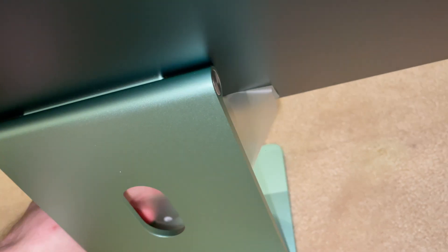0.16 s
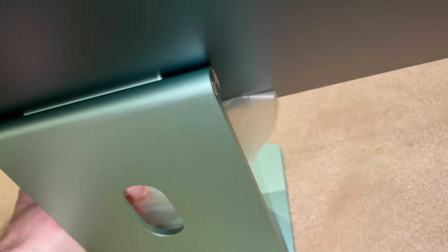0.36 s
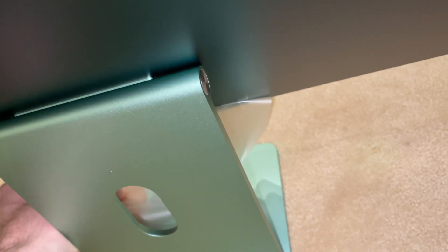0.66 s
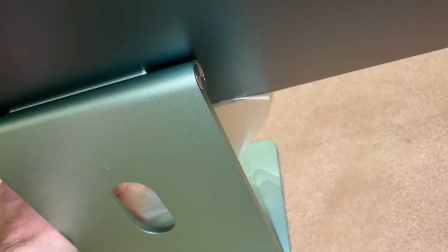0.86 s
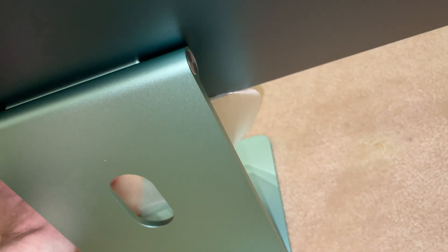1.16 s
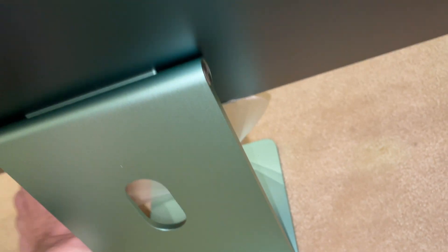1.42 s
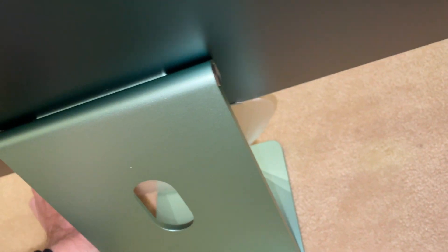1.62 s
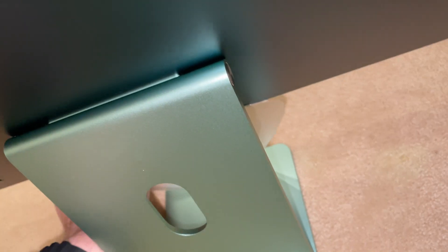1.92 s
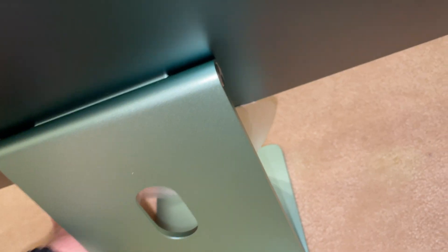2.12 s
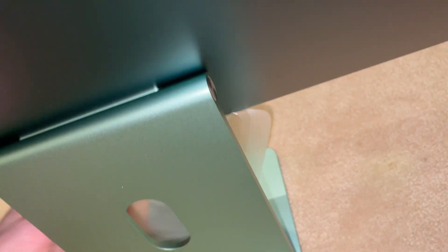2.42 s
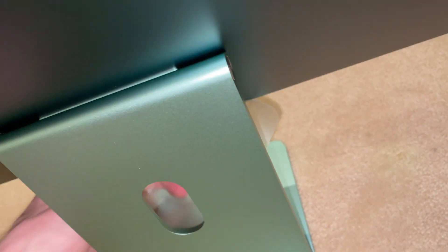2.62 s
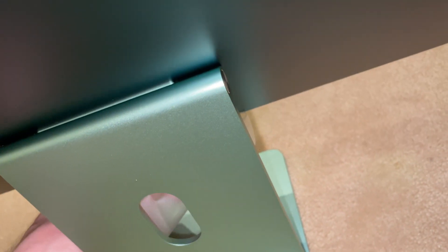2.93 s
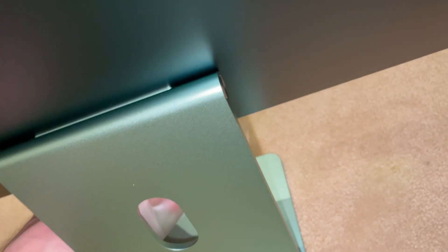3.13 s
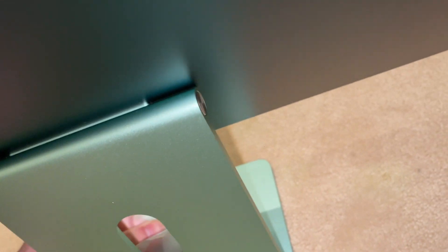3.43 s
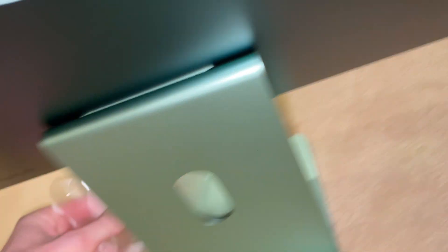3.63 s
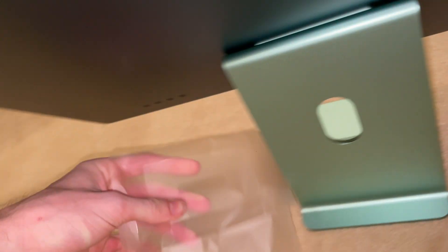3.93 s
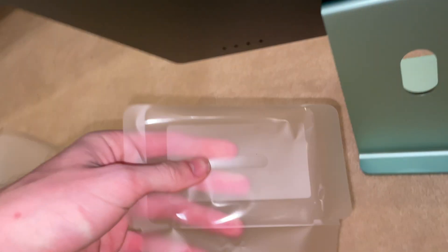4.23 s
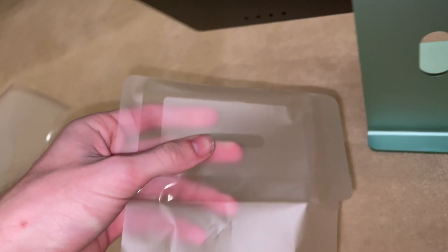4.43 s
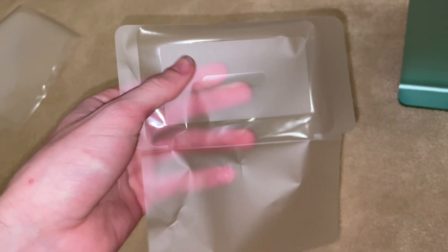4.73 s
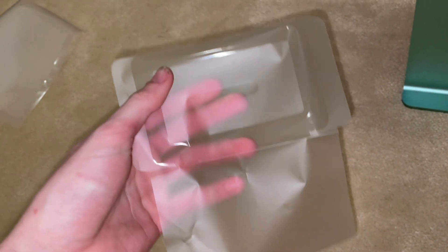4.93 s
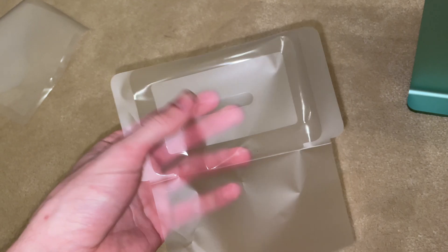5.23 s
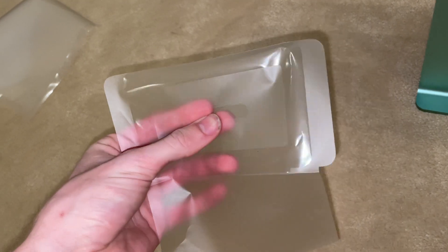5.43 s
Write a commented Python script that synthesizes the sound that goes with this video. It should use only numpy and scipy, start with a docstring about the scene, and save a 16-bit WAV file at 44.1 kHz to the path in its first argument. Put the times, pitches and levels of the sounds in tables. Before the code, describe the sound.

Close-up crinkling of a clear plastic sheet: sparse pops and soft rubbing, a dense burst of sharp cracks, a low bump, then near silence.

```python
"""A stiff plastic film is pulled off the metal stand of a monitor and turned over in one hand, close by in a quiet room.
Its creases snap through and send dispersive bending waves across the sheet, treble first and bass last.
Sliding is grainy noise, a hiss over a duller rub; the loose sheet flutters and a taut edge sings in a narrow band.
Smaller creases tick and rustle as impulses that start shorter bending waves; resonances of the sheet colour it all.
The stand is a set of damped modes: it hums when tugged, and rocks as the film comes free."""
import sys
import numpy as np
from scipy import signal
from scipy.fft import rfft, irfft, next_fast_len
from scipy.io import wavfile

SR = 44100
rng = np.random.default_rng(int(sys.argv[2]) if len(sys.argv) > 2 else 0)


def persist_wave(psi):
    """Save psi, clipped to +-1, as 16-bit WAV."""
    counts = np.round(np.clip(psi, -1, 1) * 32767).astype(np.int16)
    wavfile.write(sys.argv[1], SR, np.atleast_2d(counts).T)


N = 245195
TIME = np.arange(N) / SR
WAVE_SIZE = 6144   # samples in one bending wave

# large creases snapping through; travel is the bending-wave delay at 1 kHz before the delay at the top is taken off;
# levels are relative: start_s, travel_ms, thud_db, crack_db, ring_hz
CREASES = [(0.0836,1.6,-41.5,-33.5,3240), (0.1205,2.53,-23,-22,2970), (0.129,1.78,-33,-26,910),
           (0.1459,2,-36,-28,3370), (0.2104,1.1,-36,-34.5,3280), (0.2458,2.6,-29,-32.5,586),
           (0.342,4.6,-35,-69,630), (.458,3.6,-31,-76,635), (0.5229,2.07,-24,-35.5,650),
           (.529,2.8,-41,-37,610), (0.6263,1,-44.5,-37.5,4540), (.671,1.76,-25.5,-37.5,443),
           (1.037,4.9,-41.5,-70,380), (1.1643,0.61,-41,-31.5,2480), (1.3448,2.2,-27,-27,634),
           (1.491,3.17,-27,-57,780), (1.719,2.7,-35,-54.5,298.7), (1.845,1.1,-31.5,-29,920),
           (1.9046,1.23,-23,-19.5,1160), (2.03,1.3,-41,-37,6600), (2.053,1.77,-27,-33.5,683),
           (2.067,1.6,-23.5,-45,540), (2.0956,1.3,-23.5,-33,1080), (2.147,2.77,-25,-27,750),
           (2.1655,3.1,-24,-19.5,1300), (2.208,1.67,-29,-31,384), (2.3136,1.64,-33.5,-36,3720),
           (2.486,1.2,-30.5,-38,575.5), (2.56,1.84,-23,-38,605), (2.596,1.1,-29.5,-24,3540),
           (2.6258,2.06,-22,-35,600), (2.6381,1.6,-18.5,-24.5,514), (2.6574,1.2,-31,-21.5,590),
           (2.6636,1.32,-13,-20.5,570), (2.676,1.2,-32.5,-23.5,623), (2.7139,1.3,-30,-28.5,3050),
           (2.7696,1,-32,-22.5,5670), (2.789,1.4,-24.5,-33,414), (2.83,3.8,-30.5,-63,405.5),
           (2.934,1.3,-14,-21.5,2500), (2.984,1.63,-26,-24.5,3050), (3.1188,1.4,-24.5,-27,900),
           (3.1322,2.24,-12.5,-24,1365), (3.1355,1.2,-16.5,-14,1409), (3.1574,1.3,-13,-15,814),
           (3.162,2.3,-13,-19.5,571), (3.172,1.5,-25.5,-20,3600), (3.278,1.2,-30.5,-41.5,1150),
           (3.334,1.62,-33.5,-39,1242), (3.4406,1,-46,-37.5,1530), (3.501,1.1,-52,-30,2940),
           (3.526,1,-64,-34,2000), (3.5362,1.2,-38,-39,1400), (3.552,1,-61,-33.5,2470),
           (3.5999,1,-39,-33,2340), (3.759,1.68,-35.5,-45,940), (3.876,3.1,-42,-35.5,6640),
           (4.031,1.4,-42,-59,930), (4.063,2.1,-29,-23.5,2450), (4.5522,1.67,-44,-60,894),
           (5.3188,1.55,-40,-36.5,4430), (5.356,1.55,-31.5,-26,3770), (5.469,2.65,-41,-53.5,354)]


def from_db(db):
    """Level to amplitude: 20 dB is a factor of ten."""
    return 10 ** (np.asarray(db) / 20)


def rms_one(x):
    """Normalise the mean power to 1."""
    return x / np.sqrt(np.mean(x ** 2) + 1e-20)


def unit_energy(x):
    """Normalise the energy of each row to 1."""
    return x / np.linalg.norm(x, axis=-1, keepdims=True)


def in_time(rows):
    """Linear interpolation of each column of a curve at every sample."""
    s, *columns = np.transpose(rows)
    return [np.interp(TIME, s, column) for column in columns]


def at_hz(points, hz, axis=1):
    """Interpolation of one column along a logarithmic frequency axis."""
    points = np.array(points)
    return np.interp(np.log(np.maximum(hz, 1)), np.log(points[:, 0]), points[:, axis])


def band(x, low_hz, high_hz, order=2):
    """Causal Butterworth band-pass."""
    edges = [low_hz, min(high_hz, SR / 2 - 100)]
    return signal.sosfilt(signal.butter(order, edges, "band", fs=SR, output="sos"), x)


def colour(x, gain_at):
    """Linear filtering: the spectrum is multiplied by a gain given as a function of frequency."""
    size = next_fast_len(N + WAVE_SIZE)
    gain = gain_at(np.fft.rfftfreq(size, 1 / SR))
    return irfft(rfft(x, size) * gain, size)[..., :N]


def shaped(x, spectrum):
    """Spectral shaping of a noise, brought to an rms of 1."""
    return rms_one(colour(x, lambda hz: from_db(at_hz(spectrum, hz))))


def drift(per_s):
    """Slow random modulation: straight lines between Gaussian knots, rms 1."""
    knots = rng.standard_normal(N)
    return rms_one(np.interp(TIME * per_s, np.arange(N), knots))


def add(track, s, sound):
    """Superposition: mix a sound into a track from time s on."""
    start = max(round(s * SR), 0)
    track[..., start:start + sound.shape[-1]] += sound[..., :N - start]


def room_tone():
    """Stationary background: Gaussian noise with a falling spectrum."""
    # faint tone of the room: frequency_hz, density_db
    tone_spectrum = [(25, -10.5), (80, -9), (150, -23), (330, -30.5), (900, -44.5), (3500, -51),
                     (16000, -68.5)]
    return from_db(-64.5) * shaped(rng.standard_normal((2, N)), tone_spectrum)


def stand():
    """Forced modal vibration: a short half-sine push makes the stand hum, a long one rocks the heavy screen."""
    # tugs on the stand: start_s, impulse_db, push_ms
    tugs = [(0.669, -34.5, 0.85), (1.729, -30, 4.7), (3.168, -8.5, 12)]
    # modes of stand and screen: frequency_hz, level_db, t60_s
    modes = [(57.3, -17.5, 0.55), (87.5, -4, 0.17), (204, -8, 0.29), (206, 5.5, 0.14)]
    force = np.zeros(N)
    for s, db, push_ms in tugs:
        phase = (TIME - s) * 1e3 / push_ms
        push = np.sin(np.pi * np.clip(phase, 0, 1))
        force += from_db(db) * push / push.sum()
    out = 0
    for hz, db, t60 in modes:
        radius = from_db(-60 / (t60 * SR))
        angle = 2 * np.pi * hz / SR
        resonator = [0, np.sin(angle)], [1, -2 * radius * np.cos(angle), radius ** 2]
        out = out + from_db(db) * signal.lfilter(*resonator, force + 1e-18)
    return out * np.array([[1], [0]])   # all of it in the common signal


def stroke(start_s, length_s, swell_share=0.24, release_s=0.026):
    """Amplitude envelope of a hand movement: gathers speed over a share of its length, holds and decays."""
    swell = np.sin(np.pi / 2 * np.clip((TIME - start_s) / (swell_share * length_s), 0, 1)) ** 2
    return swell * np.exp(-np.maximum(TIME - start_s - length_s, 0) / release_s)


def edge_drags():
    """Narrow-band friction: a taut edge rubs unevenly in a band that wanders with its free length."""
    # drags of the edge: start_s, length_s, level_db, centre_hz, width_hz
    drags = [(0.785, 0.15, -60, 2190, 350), (1.45, 0.73, -54.5, 621.3, 257), (2.94, 0.27, -36.5, 871, 505),
             (4.464, 0.335, -69.5, 2123, 447), (4.698, 0.085, -62, 6100, 1300)]
    wander_octaves = 0.04   # rms
    out = 0
    for start_s, length_s, db, hz, width_hz in drags:
        pitch_hz = hz * 2 ** (wander_octaves * drift(9))
        lowpass = signal.butter(2, width_hz / 2, fs=SR, output="sos")
        spread = signal.sosfilt(lowpass, rng.standard_normal((2, 2, N)))
        phase = 2 * np.pi * np.cumsum(pitch_hz) / SR
        rub = spread[0] * np.cos(phase) + spread[1] * np.sin(phase)
        rub = rub * from_db(3.2 * drift(40))
        out = out + from_db(db) * stroke(start_s, length_s) * rms_one(rub)
    return out


def pulling():
    """Power sum of a resting level, a faint sliding and the pulls: levels of the rub and of the hiss in dB."""
    # pulls of the film over metal and skin: start_s, length_s, rub_db, hiss_db
    pulls = [(-.03, 0.077, -52.5, -53), (0.1, 0.031, -40, -37), (0.137, 0.42, -54, -57),
             (0.634, 0.15, -55.5, -62), (0.794, 0.11, -52, -53.5), (0.862, 0.34, -55.5, -57.5),
             (1.276, 0.2, -49.5, -53), (1.47, 0.1, -53, -64.5), (1.667, 0.095, -48, -56.5),
             (1.754, 0.26, -58.5, -60), (1.882, 0.062, -49, -50), (2.027, 0.16, -41, -45),
             (2.19, 0.13, -47.5, -49.5), (2.332, 0.29, -55, -52.5), (2.502, 0.24, -39, -36.5),
             (2.72, 0.18, -53, -51.5), (2.882, 0.44, -47, -54.5), (3.115, 0.22, -51, -44.5),
             (3.441, 0.11, -45, -43), (3.568, 0.14, -48, -45), (3.713, 0.17, -50, -45.5),
             (3.87, 0.052, -52, -52), (3.975, 0.17, -58, -55.5), (4.135, 0.25, -64, -69.5),
             (4.448, 0.14, -59.5, -61.5), (4.614, 0.18, -70.5, -64.5), (5.167, 0.35, -73, -70),
             (5.296, 0.093, -56, -58), (5.46, 0.11, -68, -55)]

    def amplitudes(rub_db, hiss_db):
        return from_db([[rub_db], [hiss_db]])

    # until it fades near the end, a faint sliding goes on beneath the pulls
    fade_from_s, fade_s = 4.315, 0.15
    fade = np.exp(-np.maximum(TIME - fade_from_s, 0) / fade_s)
    resting = amplitudes(-86, -92.5)   # held still between the fingers
    power = resting ** 2 + (amplitudes(-62.5, -69) * fade) ** 2
    for start_s, length_s, rub_db, hiss_db in pulls:
        power = power + (amplitudes(rub_db, hiss_db) * stroke(start_s, length_s)) ** 2
    return 10 * np.log10(power)


def slips(per_s, size_db, decay_ms, share):
    """Stick-slip friction: tiny decaying bursts of uneven size over a smooth base; an envelope of rms 1."""
    happens = rng.random(N) < per_s / SR
    sizes = from_db(size_db * np.minimum(rng.exponential(1, N), 4)) * happens
    bursts = signal.lfilter([1], [1, -np.exp(-1e3 / (decay_ms * SR))], sizes + 1e-18)
    return np.sqrt(1 - share + share * rms_one(bursts) ** 2)


def grainy(white, count=8):
    """Noise modulated by stick-slip: each slip excites only its own part of the spectrum."""
    edges_hz = np.geomspace(100, 18000, count + 1)
    out = 0
    for k, (low_hz, high_hz) in enumerate(zip(edges_hz, edges_hz[1:])):
        envelope = slips(per_s=110, size_db=5.5, decay_ms=2.6, share=0.34)
        out = out + band(white[k % 2] * envelope, low_hz, high_hz)
    return out


def waving(rub_db):
    """Forced flutter of a loose sheet: the rubbing stirs it, and every snap shakes it equally for a moment; a gain."""
    # slack, as the flutter under a typical rub: time_s, level_db
    slack = [(0, -44.5), (1.4, -49), (2.3, -40), (2.7, -51.5)]
    typical_rub_db, follow_share = -51.5, 0.61   # the flutter follows a share of the rub's swing
    shake_db, shake_decay_s = -51, 0.029
    kicks = np.zeros(N)   # power
    for s, *_ in CREASES:
        kicks[round(s * SR)] = from_db(shake_db) ** 2
    shake = signal.lfilter([1], [1, -np.exp(-2 / (shake_decay_s * SR))], kicks + 1e-18)
    slack_db, = in_time(slack)
    stirred_db = slack_db + follow_share * (rub_db - typical_rub_db)
    return np.sqrt(shake + from_db(stirred_db) ** 2)


def sliding(rub_db, hiss_db, pivot_hz=4500):
    """Sliding friction over metal and skin: a grainy hiss, a duller rub, and the loose sheet fluttering."""
    # spectra of the three noises: frequency_hz, density_db
    hiss_spectrum = [(900, -20.5), (1500, -5), (1900, -10.5), (2300, -9.5), (4400, -4.5), (6800, -7.5),
                     (8400, -16.5), (10500, -9.5), (13000, -13.5), (15000, -23), (16500, -43)]
    rub_spectrum = [(150, -25), (300, -2), (600, -0.5), (1100, -4), (1450, -10.5), (1800, -15.5),
                    (3500, -29)]
    flutter_spectrum = [(25, -41), (45, -6.5), (85, 5.5), (130, -5.5), (200, -0.5), (290, -25.5),
                        (600, -47)]
    # the speed of the sliding lifts the top of the hiss: time_s, tilt_db
    brightness = [(0, 1.5), (1.0, -5), (1.6, -4.5), (2.65, 0), (3.3, -7), (3.55, 0), (3.82, 8), (4.0, -1.5)]
    tilt_db, = in_time(brightness)
    hiss = shaped(grainy(rng.standard_normal((2, 2, N))), hiss_spectrum)
    top = colour(hiss, lambda hz: hz ** 4 / (hz ** 4 + pivot_hz ** 4))
    hiss = top * from_db(tilt_db) + (hiss - top) * from_db(-tilt_db)
    rub = shaped(grainy(rng.standard_normal((2, 2, N))), rub_spectrum)
    uneven = rng.standard_normal((2, N)) * from_db(4.4 * drift(30))
    flutter = shaped(uneven, flutter_spectrum)
    return hiss * from_db(hiss_db) + rub * from_db(rub_db) + flutter * waving(rub_db)


def crease_resonances(ring_hz, ripple_hz=300, damped_above_hz=10000):
    """Minimum-phase resonance: each crease rings at its own pitch among chance ones, never before the snap."""
    ring_height_db, half_width_octaves, ripple_db = 8.5, 0.15, 4.5
    hz = np.fft.rfftfreq(WAVE_SIZE, 1 / SR)
    draws = rng.standard_normal((len(ring_hz), len(hz)))
    bumps = np.array([np.interp(hz / ripple_hz, np.arange(len(draw)), draw) for draw in draws])
    chance_db = ripple_db * bumps * hz / (hz + ripple_hz) / (1 + (hz / damped_above_hz) ** 2)
    octaves_off = np.log2((hz + 1) / ring_hz[:, None])
    ring_db = ring_height_db / (1 + (octaves_off / half_width_octaves) ** 2)
    # folding the cepstrum onto positive times makes the response causal
    cepstrum = irfft(np.log(from_db(ring_db + chance_db)))
    causal = np.sign(np.fft.fftfreq(WAVE_SIZE)) + 1
    return np.exp(rfft(cepstrum * causal))[:, None]


def bending_waves(rows, dispersion=0.7, rise_ms=0.084):
    """Dispersion in a plate: per row (travel ms, ring Hz, four register dB), a pulse and its edge reflections."""
    # registers from flap to tick, decay of the reflections and their energy share:
    # low_hz, high_hz, decay_ms, reflected_share
    registers = [(68, 220, 9.1, 0.64), (250, 896, 2.4, 0.61), (1150, 5930, 3, 0.42),
                 (4000, 11000, 3.3, 0.39)]
    t = np.arange(WAVE_SIZE) / SR
    ms = t * 1e3
    khz = np.fft.rfftfreq(WAVE_SIZE, 1 / SR) / 1e3
    # low notes travel slowest: the delay falls to nothing at the top of the treble
    power = 1 - dispersion
    spread = khz ** power / power - khz * khz[-1] ** (power - 1)
    path = np.exp(-2j * np.pi * rows[:, 0, None, None] * spread) * crease_resonances(rows[:, 1])
    chance = rng.standard_normal((len(rows), len(registers), 2, WAVE_SIZE))
    waves = 0
    for k, (low_hz, high_hz, decay_ms, reflected) in enumerate(registers):
        envelope = np.exp(-ms / decay_ms) * (1 - np.exp(-ms / rise_ms))
        wave = unit_energy(band(chance[:, k] * envelope + 1e-18, low_hz, high_hz))
        direct = unit_energy(band((t == 0) + 1e-18, low_hz, high_hz))
        wave[:, 0] = np.sqrt(reflected) * wave[:, 0] + np.sqrt(1 - reflected) * direct
        waves = waves + unit_energy(irfft(rfft(wave) * path)) * from_db(rows[:, 2 + k, None, None])
    return waves * np.sqrt(0.01 * SR)   # register levels are rms over 10 ms


def small_creases(count, register_db=(-10, -1.5, 0.1, -11)):
    """Dispersive waves of small creases: alike in balance, each with its own travel time and ring."""
    travel, pitch = rng.random((count, 2)).T
    balance = np.tile(register_db, (count, 1))
    return bending_waves(np.column_stack([0.715 + 1.414 * travel, 900 * 5.0 ** pitch, balance]))


def crinkles(hiss_db, count=18):
    """Random impulse process: small creases give way during crumpling, louder the harder the film is pulled."""
    # crumpling of the film, level over the hiss: time_s, creases_per_s, level_db
    crumpling = [(.9, 63, -9.5), (1.9, 21, -18), (2.1, 130, -2.5), (2.7, 120, -3.5), (3.25, 120, -4),
                 (3.85, 70, -6), (4.4, 38, -6)]
    per_s, gain_db = in_time(crumpling)
    sizes_db = 4.5 * np.minimum(rng.exponential(1, N), 3)
    clicks = from_db(sizes_db) * (rng.random(N) < per_s / SR)
    dealt = rng.integers(0, count, N)   # which wave each click starts
    out = 0
    for k, wave in enumerate(small_creases(count)):
        out = out + signal.oaconvolve((clicks * (dealt == k))[None], wave, axes=-1)[:, :N]
    return rms_one(out) * from_db(gain_db + hiss_db)


def ticks():
    """Isolated impulses: the small creases that stand out from the rustle."""
    # clearest small creases: start_s, level_db
    clear_creases = [(.7955, -51), (.8479, -52), (1.1838, -50.5), (1.286, -53), (1.395, -44.5),
                     (1.408, -41), (2.141, -35.5), (2.3066, -41), (2.544, -42), (2.6514, -28.5),
                     (2.7257, -32), (2.7364, -37), (2.8698, -47.5), (3.2, -35), (3.2357, -38.5),
                     (3.2514, -34.5), (3.3043, -57), (3.361, -41), (3.477, -41), (3.5872, -39),
                     (3.626, -37), (3.6671, -37), (3.699, -44), (4.1783, -60.5), (4.2637, -65),
                     (4.3352, -61), (4.36, -58), (4.9635, -81), (5.0914, -77.5), (5.182, -73),
                     (5.223, -59.5), (5.2693, -63.5)]
    out = np.zeros((2, N))
    for (s, db), wave in zip(clear_creases, small_creases(len(clear_creases))):
        add(out, s, from_db(db) * wave)
    return out


def split(db, balance_db):
    """Energy partition of a level between two registers, the first stronger by balance_db."""
    second_db = db - 10 * np.log10(1 + from_db(balance_db) ** 2)
    return second_db + balance_db, second_db


def snap_registers():
    """Energy partition of each snap: rows of (travel ms, ring Hz, flap, pop, crack, tick dB)."""
    _, travel_ms, thud_db, strength_db, ring_hz = np.transpose(CREASES)
    # a wave that travels longer than 2.39 ms is more flap than pop: 17.5 dB per doubling
    flap_db, pop_db = split(thud_db, 17.5 * np.log2(travel_ms / 2.39))
    # a crack stronger than -25.5 dB is more tick than crack
    tick_db, crack_db = split(strength_db, 0.095 * (strength_db + 25.5))
    return np.column_stack([travel_ms, ring_hz, flap_db, pop_db, crack_db, tick_db])


def snaps(gain_db=-0.52, first_crack_db=-23, lead_s=0.0043):
    """Snap-through buckling of large creases; a faint crack runs just ahead as each starts to give."""
    waves = bending_waves(snap_registers())
    first_cracks = from_db(first_crack_db) * band(waves, 376, 7500)
    out = np.zeros((2, N))
    for (s, *_), wave, crack in zip(CREASES, waves, first_cracks):
        add(out, s - lead_s * rng.uniform(0.93, 3.6), crack)
        add(out, s, wave)
    return from_db(gain_db) * out


def sheet(x, sharpness=16, gain_db=-1.5):
    """Plate resonance: the sheet lifts its own resonances out of the sound."""
    # resonances of the sheet: frequency_hz, lift_db
    resonances = [(1450, 5), (2250, 6.5), (2520, 5.5), (3100, 2.5), (3700, 3), (6950, 1.5)]
    out = x.copy()
    for hz, db in resonances:
        out += (from_db(db) - 1) * signal.lfilter(*signal.iirpeak(hz, sharpness, fs=SR), x)
    return from_db(gain_db) * out


def room(x, wet_db=-22, first_s=0.00036, treble_db=-6, t60_s=0.12):
    """Diffuse reverberation: a faint, exponentially decaying noise tail, weaker in the treble."""
    t = np.arange(SR // 3) / SR
    edges_hz = np.geomspace(100, 16000, 8)
    tail = 0
    for low_hz, high_hz in zip(edges_hz, edges_hz[1:]):
        noise = band(rng.standard_normal((2, len(t))), low_hz, high_hz)
        tail = tail + noise * from_db(treble_db * low_hz / edges_hz[-2])
    tail = unit_energy(tail * from_db(-60 * t / t60_s) * (t > first_s))
    return from_db(wet_db) * signal.fftconvolve(x[:1], tail, axes=-1)[:, :N]


def microphones(pair):
    """Interchannel coherence: two unrelated signals (common, differing) become left and right."""
    # the two microphones and the paths to them, likeness from 0 to 1, left against right:
    # frequency_hz, likeness, level_difference_db, left_lead_rad
    paths = [(60.6, 0.96, 0, .05), (314, 0.96, 0.8, 0.37), (750, 1, 3.5, 0.94), (1300, 0, 6.5, 0.69),
             (1940, 0.1, -2, 3.16), (2500, .8, 3.5, 6.7), (3670, 0.5, 0, 6.42), (4880, 0.1, 3.5, 9),
             (6100, .7, 0.5, 13), (7975, 0.99, -0.5, 9.55), (14950, .95, 0.5, 3.83)]

    def gains(hz):
        alike, pan_db, lead = (at_hz(paths, hz, axis=k) for k in range(1, 4))
        left = from_db(pan_db / 2) * np.exp(.5j * lead)
        sides = np.array([left, 1 / left]) / np.sqrt(abs(left) ** 2 + abs(left) ** -2)
        common = sides * np.sqrt(1 + alike)
        differing = sides * np.sqrt(1 - alike) * [[1], [-1]]
        return np.array([common, differing])
    return colour(pair[:, None], gains).sum(axis=0)


def scene():
    """Superposition of film, its reverberation, stand and room tone at the two microphones."""
    rub_db, hiss_db = pulling()
    film = sheet(snaps() + ticks() + crinkles(hiss_db) + sliding(rub_db, hiss_db) + edge_drags())
    return microphones(film + room(film) + stand() + room_tone())


def record(dry, low_cut_hz=44, cutoff_hz=16300):
    """Band limiting: the lowest bass is rolled off and the top is cut steeply."""
    dry = signal.sosfilt(signal.butter(6, low_cut_hz, "high", fs=SR, output="sos"), dry)
    return signal.sosfilt(signal.ellip(10, .2, 80, cutoff_hz, fs=SR, output="sos"), dry)


dry = scene()
out = record(dry)
persist_wave(out)
```